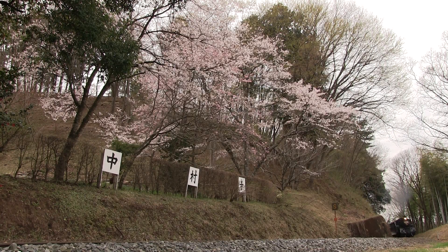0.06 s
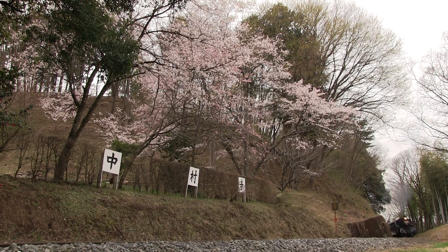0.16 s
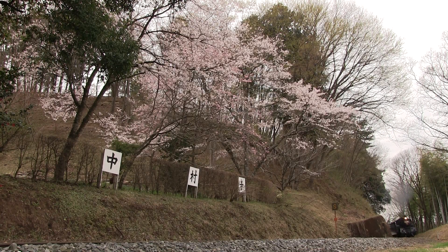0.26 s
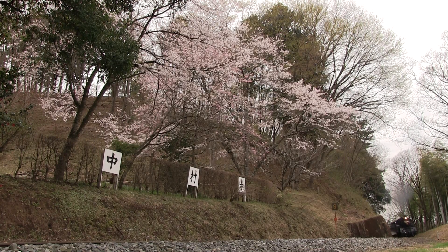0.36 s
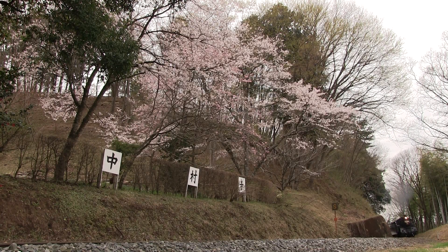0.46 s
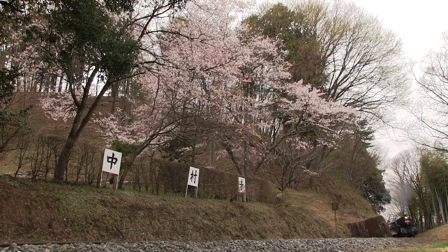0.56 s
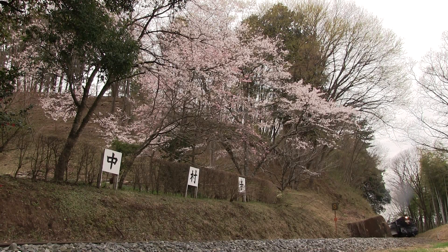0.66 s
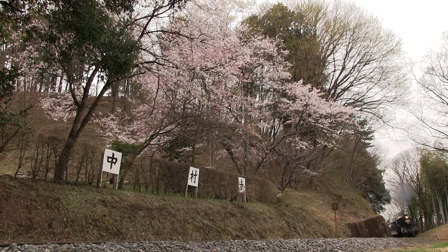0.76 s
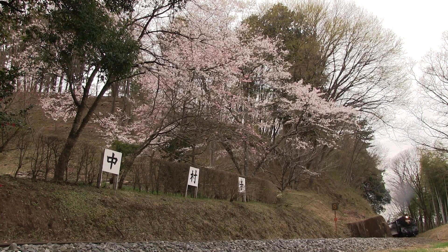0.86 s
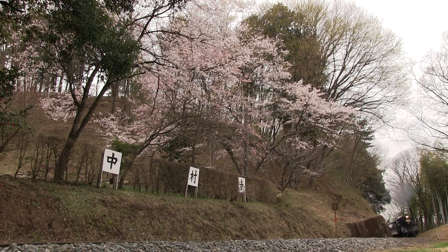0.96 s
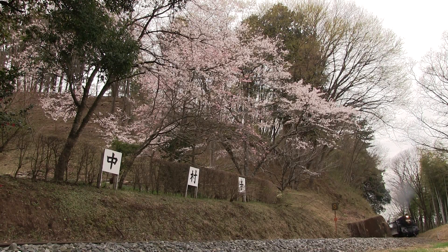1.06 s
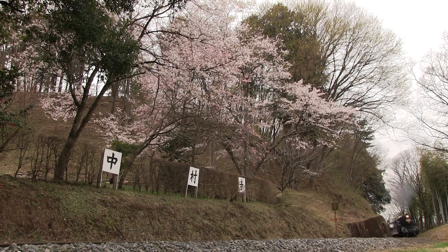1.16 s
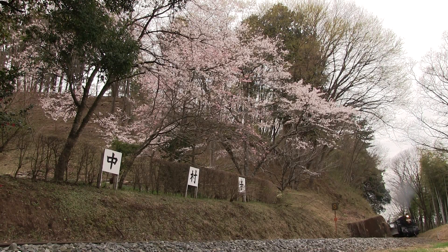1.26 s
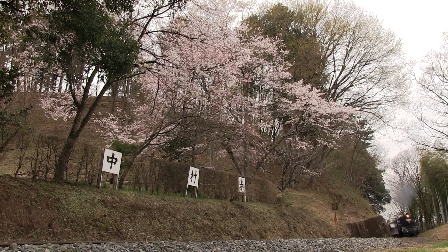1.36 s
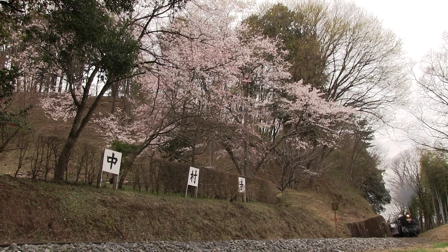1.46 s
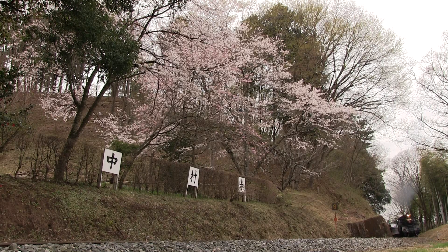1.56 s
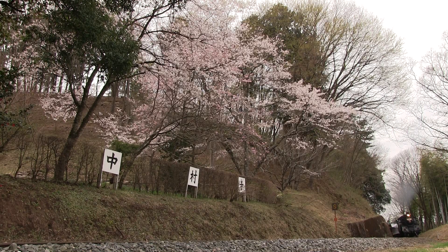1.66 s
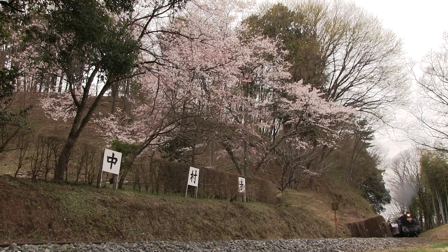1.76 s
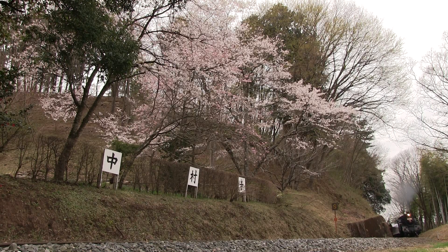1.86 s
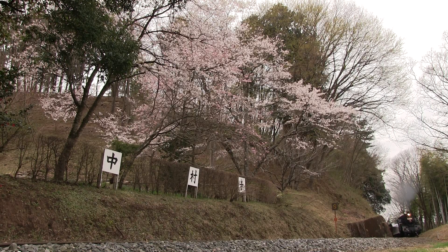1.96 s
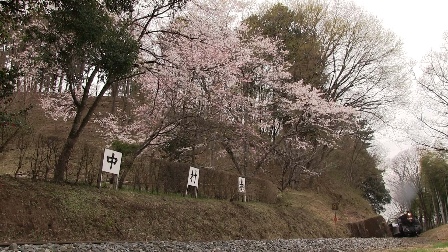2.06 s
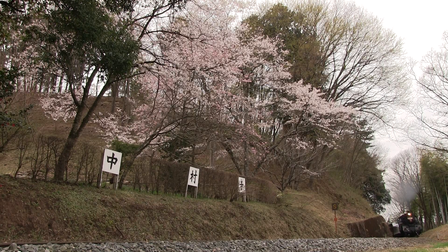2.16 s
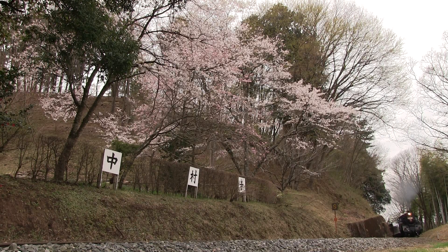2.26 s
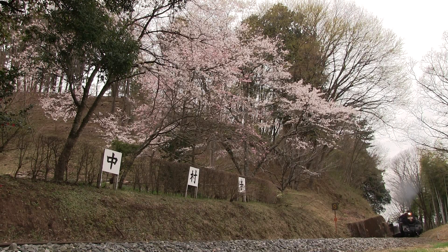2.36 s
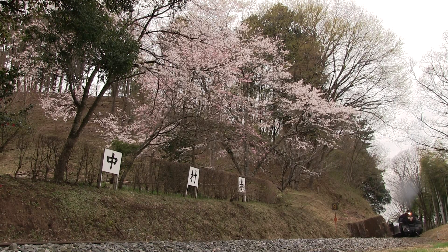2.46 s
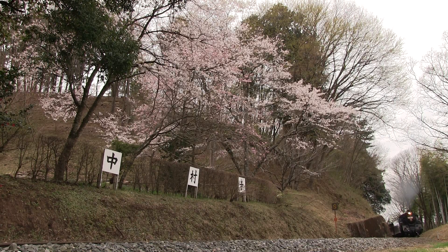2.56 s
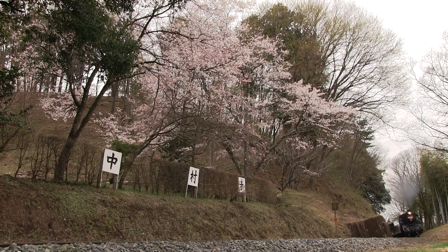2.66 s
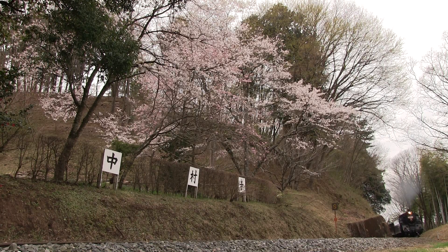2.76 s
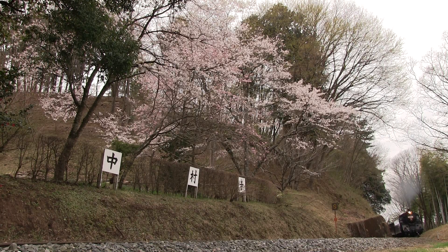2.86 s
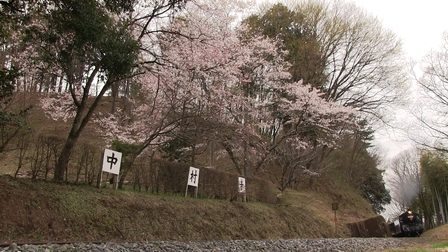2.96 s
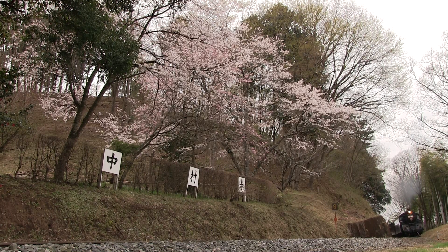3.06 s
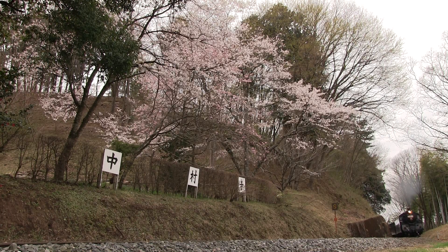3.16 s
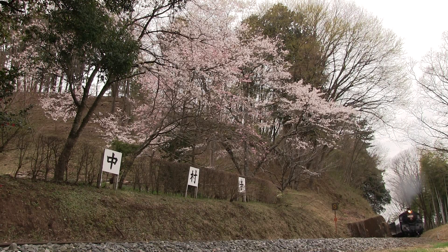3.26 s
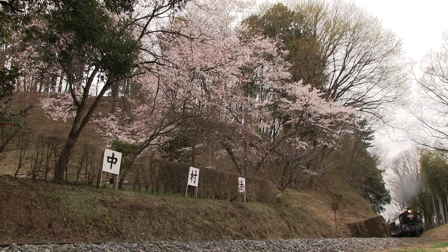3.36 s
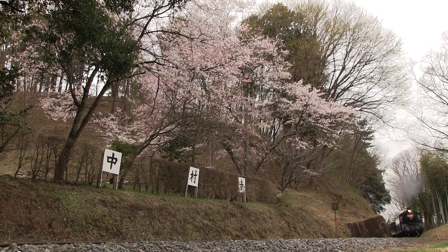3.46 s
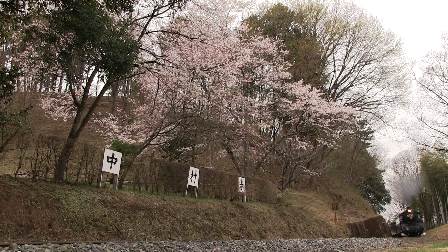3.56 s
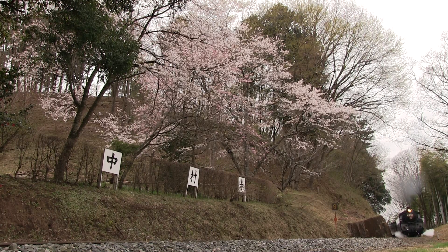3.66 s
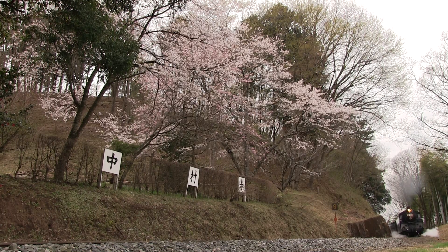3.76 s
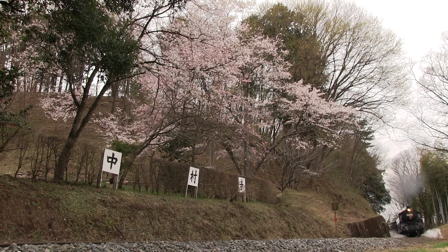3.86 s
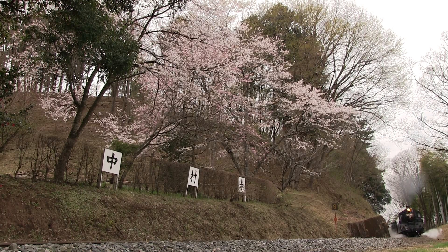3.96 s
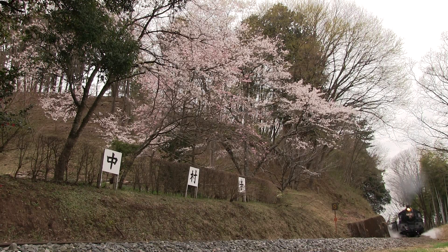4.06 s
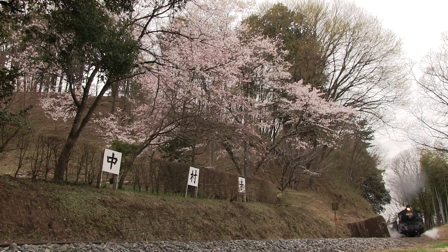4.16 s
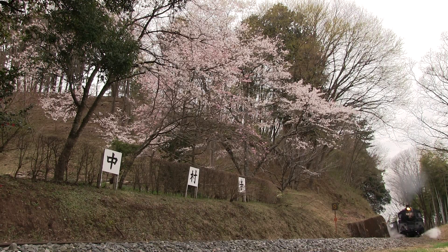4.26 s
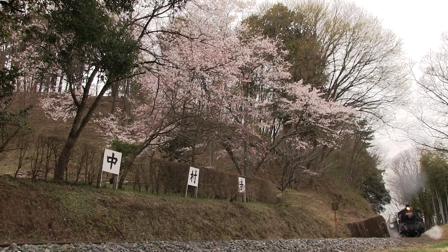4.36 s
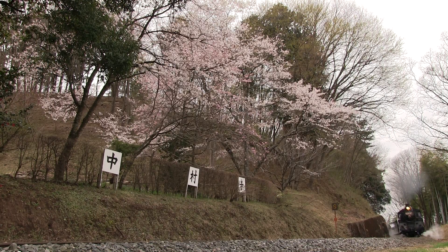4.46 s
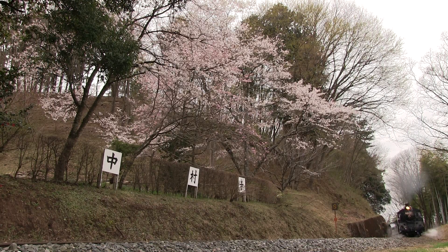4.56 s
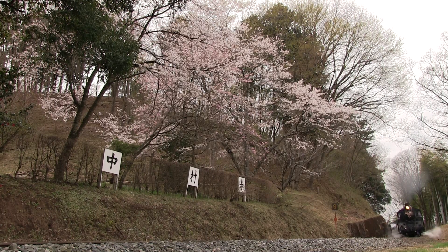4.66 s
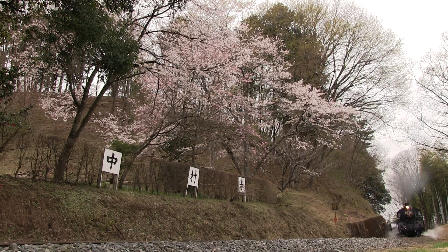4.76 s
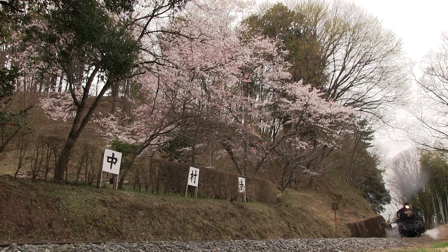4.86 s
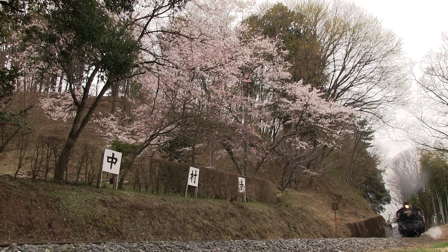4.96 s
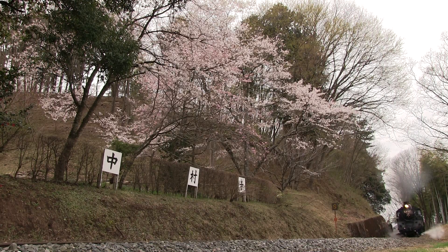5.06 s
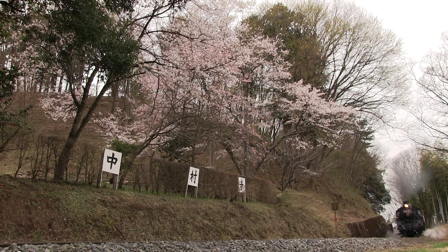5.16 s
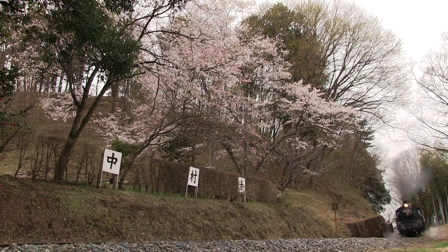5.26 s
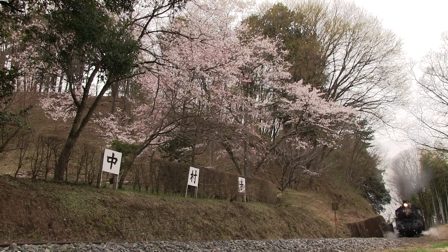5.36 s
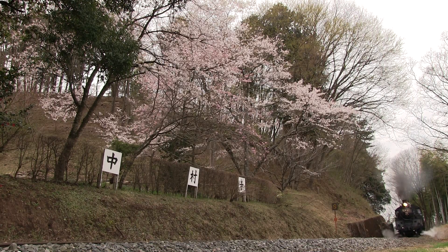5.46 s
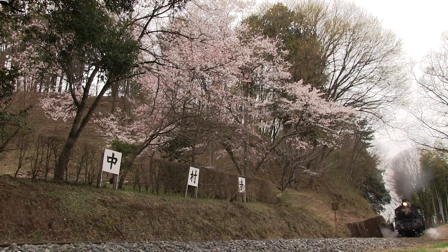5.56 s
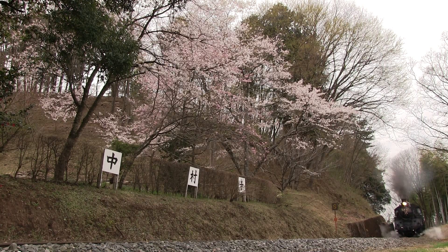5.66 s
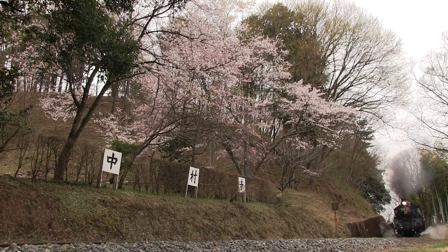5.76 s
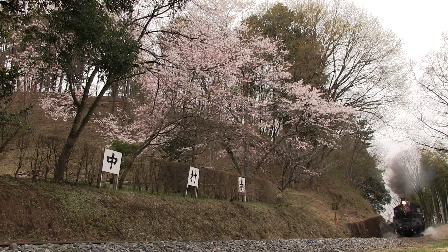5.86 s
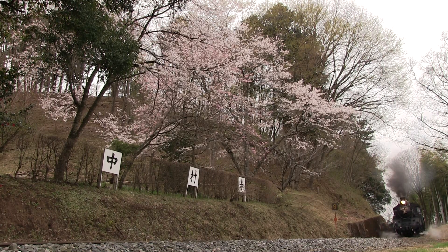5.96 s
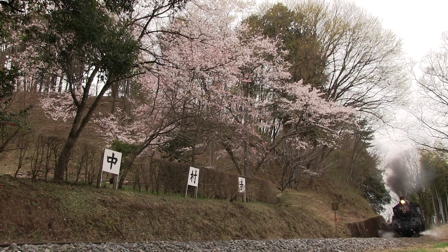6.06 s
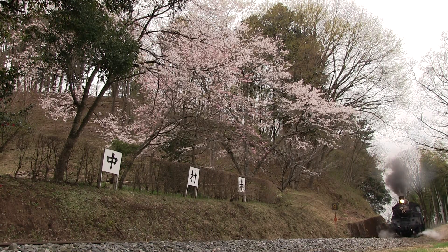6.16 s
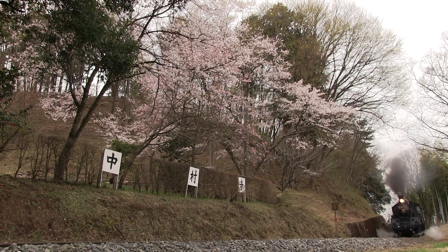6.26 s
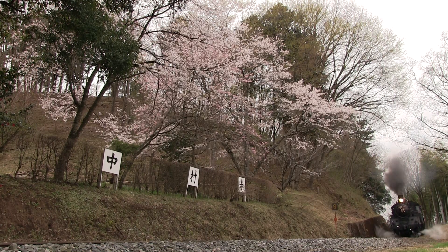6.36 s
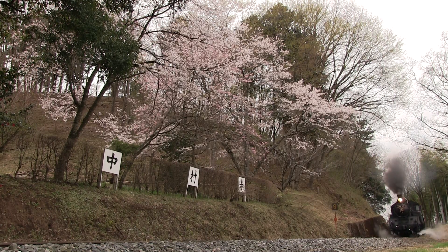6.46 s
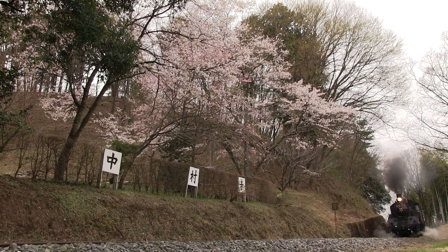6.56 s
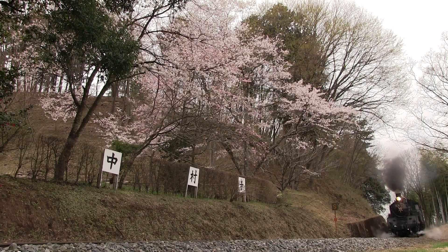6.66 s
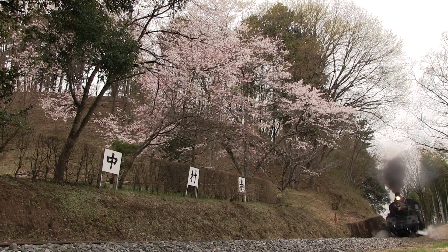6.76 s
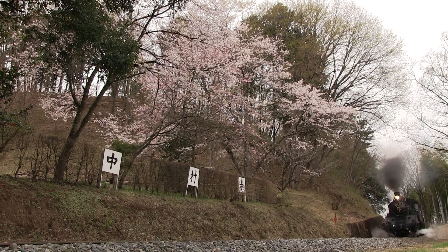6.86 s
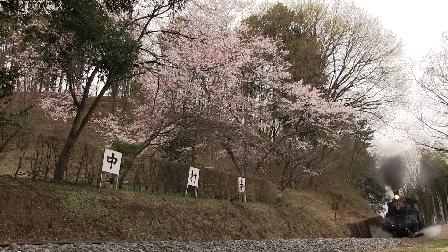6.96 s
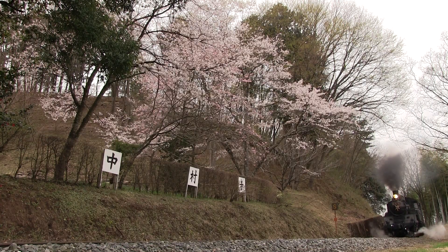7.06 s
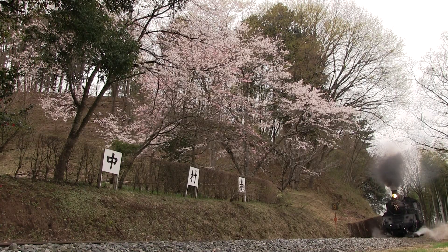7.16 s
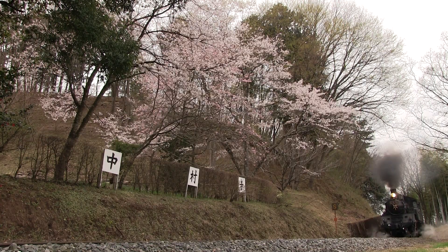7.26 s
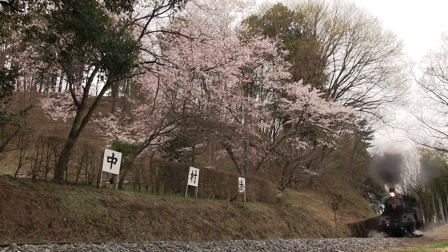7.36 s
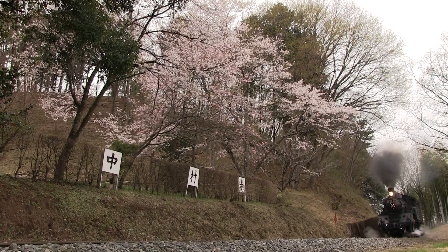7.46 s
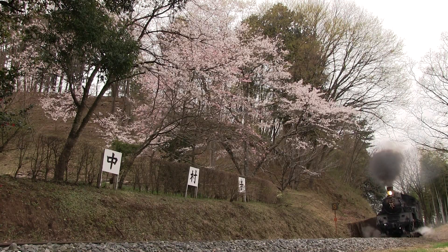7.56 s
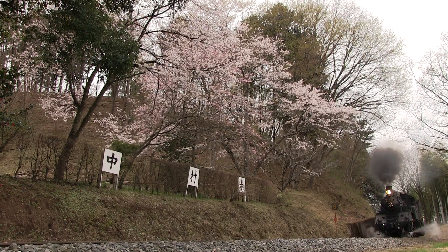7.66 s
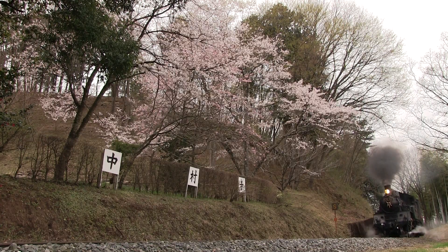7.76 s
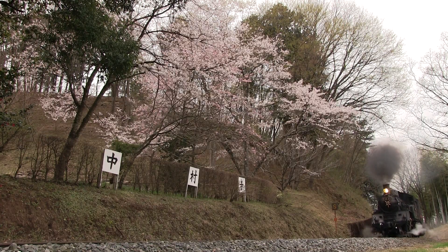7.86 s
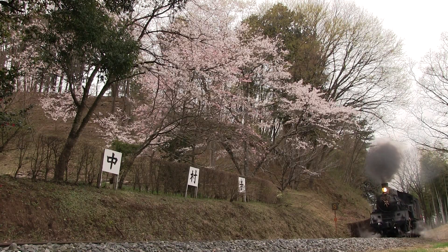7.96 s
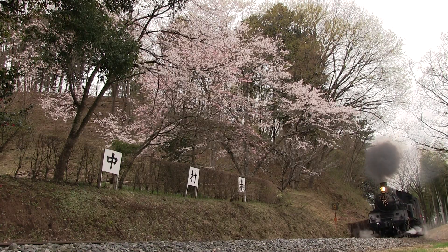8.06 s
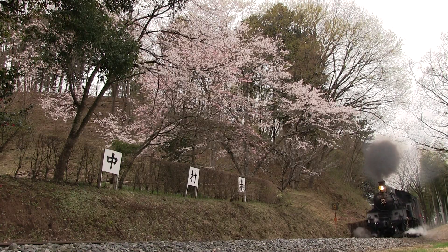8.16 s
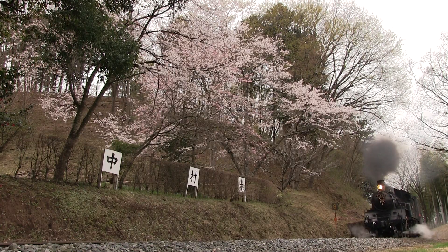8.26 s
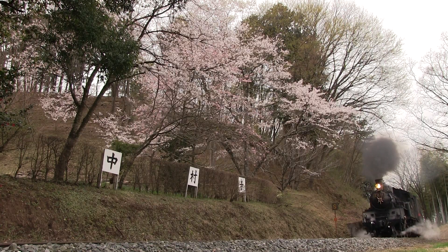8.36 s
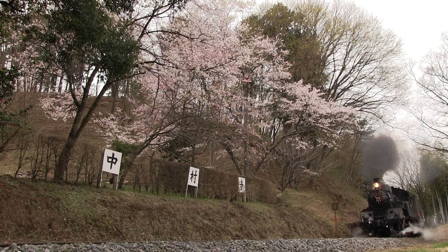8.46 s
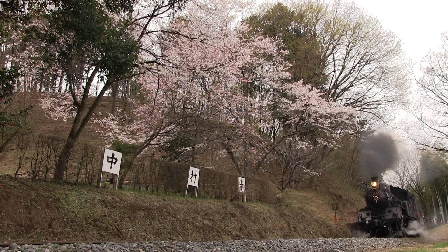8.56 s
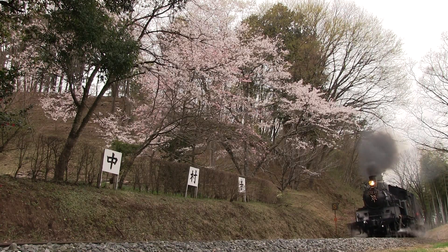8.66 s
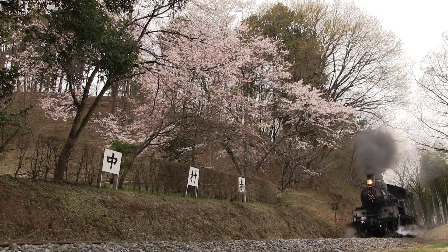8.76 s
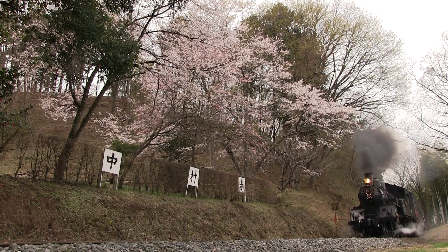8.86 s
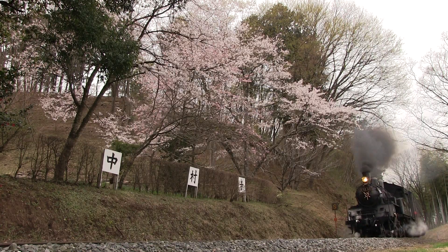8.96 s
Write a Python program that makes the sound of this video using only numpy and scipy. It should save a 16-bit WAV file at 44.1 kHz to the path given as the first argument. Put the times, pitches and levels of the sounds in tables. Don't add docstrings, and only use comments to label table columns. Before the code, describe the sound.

Outdoors beside a track in a wooded cutting, a steam locomotive approaches, slightly right of centre. Hollow, thumping exhaust chuffs come steadily, about six a second, each with a roaring blast and a short diffuse echo from the banks. Rods knock lightly over a low rumble. Just before four seconds, drain steam breaks out in a bright hiss that swells until the stationary stereo microphone overloads, the chuffs still pounding beneath.

```python
import sys
import numpy as np
from scipy import signal
from scipy.fft import rfft, irfft, next_fast_len
from scipy.io import wavfile

SR = 44100
rng = np.random.default_rng(int(sys.argv[2]) if len(sys.argv) > 2 else 0)


def nominal_scale(level):
    x = np.asarray(level, float) / 20
    return 10 ** x


def to_wav(s):
    ch = np.atleast_2d(s).T
    pcm = np.round(np.clip(ch, -1, 1) * 32767)
    wavfile.write(sys.argv[1], SR, pcm.astype(np.int16))


N = 396900

# (valve opens [s], thump peak [dB], blast level [dB], chimney tone level [dB])
EXHAUST_BEATS = [(0.051, -29, -39, -30), (0.383, -27.5, -41, -27.5), (0.722, -25.5, -38, -28),
                 (1.054, -25, -36, -22.5), (1.394, -31, -35.5, -26), (1.726, -28, -36, -29),
                 (2.068, -28, -33, -27), (2.402, -24, -34.5, -25.5), (2.743, -35, -31.5, -20.5),
                 (3.074, -22.5, -34, -27), (3.416, -25.5, -33, -24), (3.748, -22, -34, -24),
                 (4.088, -26, -33, -23.5), (4.417, -24, -33, -31), (4.757, -30, -34, -19),
                 (5.088, -21.5, -36.5, -18.5), (5.423, -26, -36, -30), (5.755, -24, -33.5, -25),
                 (6.091, -33, -32.5, -24.5), (6.422, -22, -34, -23.5), (6.758, -30, -31, -26),
                 (7.085, -23, -35, -22), (7.42, -42, -30.5, -24), (7.749, -19, -32, -23),
                 (8.08, -24, -34.5, -22.5), (8.406, -22, -28.5, -24), (8.731, -32, -30.5, -19.5),
                 (0.208, -30.5, -39, -33), (0.543, -27.3, -39, -38), (0.875, -28, -39.5, -27.5),
                  (1.218, -23, -37, -26), (1.549, -28, -36.5, -35), (1.887, -24, -34, -31),
                  (2.226, -26, -35.5, -25.5), (2.563, -21, -33, -19), (2.897, -25.5, -34, -20.5),
                  (3.235, -22.5, -33.5, -22), (3.571, -21.5, -33.5, -30), (3.908, -21, -32, -22.5),
                  (4.244, -28, -34.5, -30), (4.581, -20, -32, -37), (4.914, -29, -34, -23),
                  (5.248, -23, -34, -32), (5.579, -21, -37.5, -50), (5.915, -21, -31, -46),
                  (6.247, -26, -32.5, -25), (6.582, -23, -31, -23), (6.91, -30, -33.5, -32),
                  (7.243, -20, -32.5, -20), (7.574, -29, -34, -25.5), (7.905, -20, -30.5, -16.5),
                  (8.231, -25, -34, -25), (8.562, -23, -30, -24), (8.886, -23, -30, -35)]


def beats():
    return np.transpose(sorted(EXHAUST_BEATS))


def thumps():
    t = np.arange(int(0.1 * SR)) / SR

    def cycle(centre_s, width_s):
        u = (t - centre_s) / width_s
        return -u * np.exp(0.5 - 0.5 * u ** 2)

    shape = cycle(0.0038, 0.0017) + 0.45 * cycle(0.0171, 0.0019) + 0.36 * cycle(0.0285, 0.0019)
    open_s, thump_db, _, _ = beats()
    steps = np.zeros(N)
    steps[(open_s * SR).astype(int)] = nominal_scale(thump_db)
    return signal.fftconvolve(steps, shape)[:N]


def chimney_tone():
    open_s, _, _, tone_db = beats()
    peak_s = open_s + 0.041
    mode_hz = 179.7 + 6.02 * rng.standard_normal(len(peak_s))
    pitch_hz = np.interp(np.arange(N) / SR, peak_s, mode_hz) * flicker(0.13, 15.6)
    phase = 2 * np.pi * np.cumsum(pitch_hz) / SR
    length = 1.17 ** (np.arange(len(peak_s)) % 2)
    envelope = swells(peak_s, tone_db, rise_s=0.0065 * length, fall_s=0.016 * length)
    return envelope * flicker(0.98, 24) * (np.sin(phase) + nominal_scale(-41.0) * np.sin(2 * phase))


BLAST_LAG_S = 0.023


def blast_envelope():
    open_s, _, blast_db, _ = beats()
    return swells(open_s + BLAST_LAG_S, blast_db, rise_s=0.01, fall_s=0.027)


# (frequency [Hz], density [dB per Hz])
BLAST_SPECTRUM = [(150, -7), (260, -18), (340, -1), (476, -13), (735, -10.5), (988, -12), (1400, -11.5),
                  (1950, -15), (3520, -16), (6000, -24.5), (10200, -36), (15700, -57)]
# (frequency [Hz], width [Hz], level [dB])
BLAST_MODES = [(101.3, 22, 1.5), (183, 32.4, 6.5), (361, 92, -9.5), (563, 21, -7), (723.6, 24, -7.5),
               (1136, 51, -10.5), (1420, 70, -8), (1661, 36, -9.5), (2000, 65, -12), (2316, 58, -13),
               (3280, 370, -11)]
# (time [s], brightness [dB])
SHARPNESS = [(0, -2), (.7, 0.5), (1.3, 7.5), (1.9, 0.8), (2.8, -2.5), (3.7, -6), (5.5, 2.5), (9, -2)]


def blast(flow):
    t = np.arange(N) / SR
    open_s, _, blast_db, _ = beats()
    beat_bright_db = -0.4 - 1.08 * (blast_db + 34)
    bright_db = np.interp(t, open_s + BLAST_LAG_S, beat_bright_db) + curves(SHARPNESS)[0]
    octave_lift_db = 2.93 * np.minimum(bright_db + 1.4 * (np.arange(N) < 2.4 * SR), 3.5)
    white = rng.standard_normal(N)
    ringing = 0
    for k, (hz, width_hz, db) in enumerate(BLAST_MODES):
        level_db = db + (k == 2) * octave_lift_db
        ringing = ringing + flicker(min(hz / 320, 4.5), 11.7, level_db) * narrow(white, hz, 2.06 * width_hz)
    roar = hiss(BLAST_SPECTRUM, patchy_db=2.5, rate=19, bright_db=0.57 * bright_db, bright_hz=2060)
    return flow * (flicker(0.99, 85, 0.47) * roar + nominal_scale(-4.0) * ringing)


# (frequency [Hz], density [dB per Hz])
STEAM_SPECTRUM = [(410, -60), (700, -13), (900, -19), (1300, -12), (2000, -7.5), (2460, -6.5), (3460, -1),
                  (4200, 0), (5540, 1), (6500, 0), (10200, -1.5), (12000, -4), (15700, -9)]
# (frequency [Hz], density [dB per Hz])
LEAK_SPECTRUM = [(1500, -9), (3000, -1.5), (5000, -5), (7000, -9.5), (10000, -14.5), (15700, -26)]
# (frequency [Hz], width [Hz], level [dB])
JET_WHISTLES = [(3430, 290, -26.5), (4430, 250, -22.5), (5500, 200, -34)]
# (time [s], brightness [dB])
JET_PUFFS = [(3.79, 2), (4.08, 1.5), (4.57, 1.5), (4.79, 0), (5.4, -0.5), (5.1, -2), (5.75, -1), (6.07, 0),
             (6.42, 1), (6.73, 6.5), (7.1, 2.5), (7.38, 3.5), (7.7, 1), (8.07, 3.5), (8.37, 2), (8.7, 6),
             (9.0, 3)]


def jets(near_db):
    t = np.arange(N) / SR
    opened = 1 - np.exp(-np.maximum(t - 3.747, 0) / 0.05)
    puff_db = sum(db * np.exp(-0.5 * ((t - s) / 0.076) ** 2) for s, db in JET_PUFFS)
    air_db = -5.5 + 1.07 * (near_db - 5) + 0.27 * puff_db
    steam = hiss(STEAM_SPECTRUM, patchy_db=0.5, rate=5.0, bright_db=-1.7 + puff_db, bright_hz=4150,
                 air_db=air_db, side_db=-8.5 + 0.92 * near_db)
    white = rng.standard_normal(N)
    for hz, width_hz, db in JET_WHISTLES:
        whistle_db = db + 0.43 * (near_db - 5)
        steam = steam + flicker(1.6, 8.1, whistle_db) * narrow(white, hz, width_hz)
    leaks = hiss(LEAK_SPECTRUM, patchy_db=1.5, rate=3.5, bright_db=1.9 * (near_db - 1.0),
                 bright_hz=6000, count=5)
    steam_gain = nominal_scale(-25.0 + near_db - 0.033 * puff_db)
    leak_gain = nominal_scale(-54 + 2.2 * near_db)
    return opened * steam_gain * steam + (1 - opened) * leak_gain * leaks


# (frequency [Hz], density [dB per Hz])
TAIL_SPECTRUM = [(150, -45), (250, -5.5), (788, -5.5), (1120, -7.5), (2000, -3.5), (3000, -11.5),
                 (5630, -22.5), (9660, -35), (15700, -44)]


def bank_echoes(flow):
    r = nominal_scale(-120 / (0.9 * SR))
    lead = SR // 2
    power = signal.lfilter([1 - r], [1, -r], np.r_[flow[:lead], flow] ** 2)[lead:]
    return nominal_scale(-8.0) * np.sqrt(power) * hiss(TAIL_SPECTRUM, patchy_db=4.3, rate=3.8, count=5)


# (time [s], mode [Hz], peak [dB], 60 dB decay time [s])
ROD_KNOCKS = [(.745, 1420, -33, 0.12), (1.048, 1420, -36, 0.076), (1.225, 1700, -36, 0.16),
              (1.59, 1420, -39, .15), (1.73, 1470, -51, 1), (1.735, 2000, -42, 0.47),
              (1.888, 1990, -41, .2), (2.23, 756.5, -37.5, 0.32), (2.42, 745, -36, .35),
              (2.424, 1637, -32, 0.077), (2.76, 1404, -36, 0.17), (3.075, 2000, -45, 0.23),
              (3.435, 1384, -29.5, 0.16), (3.57, 2000, -45, 0.15)]


def rods():
    out = np.zeros(N)
    t = np.arange(SR // 2) / SR
    for s, hz, db, t60_s in ROD_KNOCKS:
        envelope = nominal_scale(db - 60 * t / t60_s) * (1 - np.exp(-t / 0.0015))
        out[round(s * SR):][:len(t)] += envelope * np.sin(2 * np.pi * hz * t)
    return out * flicker(4.1, 25)


# (frequency [Hz], density [dB per Hz])
RUMBLE_SPECTRUM = [(15, -48), (25, -10), (74, -1.5), (124, 2.5), (173, 1), (202, 0), (257, -14.5),
                   (300, -48), (390, -41), (660, -120)]
# (frequency [Hz], density [dB per Hz])
RATTLE_SPECTRUM = [(150, -25), (300, 0), (600, 0), (1200, -5), (2500, -15), (5000, -55)]


def rolling(near_db, flow):
    r = nominal_scale(-60 / (0.22 * SR))
    draught = unit(signal.lfilter([1 - r], [1, -r], flow * nominal_scale(-near_db)))
    rumble = nominal_scale(-43.5 + 0.88 * near_db) * hiss(RUMBLE_SPECTRUM, patchy_db=2.5, rate=6.6, count=2)
    rattle = nominal_scale(-52.5 + 1.425 * near_db) * hiss(RATTLE_SPECTRUM, patchy_db=-1.0, rate=7, count=5)
    return rumble * (1 - 0.34 + 0.34 * draught) + rattle


# (frequency [Hz], left-right likeness [0 to 1])
LIKENESS = [(60, 1), (640, 0.95), (1400, 0.95), (3100, .96), (5500, 0.95), (7500, 0.99), (8800, 0.99),
            (15000, 1)]


def hiss(spectrum, patchy_db, rate, bright_db=0, bright_hz=4600, air_db=0, side_db=0, count=10):
    size = next_fast_len(N)
    hz = np.arange(size // 2 + 1) * SR / size
    alike = np.clip(at_hz(LIKENESS, hz), 0, 1)
    mid_side = np.sqrt([1 + alike, 1 - alike])
    pair = nominal_scale(at_hz(spectrum, hz)) * mid_side * rfft(rng.standard_normal((2, size)))
    power = np.abs(pair[0]) ** 2
    place = np.clip((count - 1) / 6 * np.log2((hz + 1) / 250), 0, count - 1)
    out = 0
    for k in range(count):
        share = np.clip(1 - np.abs(place - k), 0, 1)
        if np.sum(power * share) > 1e-6 * power.sum():
            band_hz = 250 * 2 ** (6 * k / (count - 1))
            lift = np.clip(np.log2(band_hz / bright_hz), 0, 1.2)
            level_db = lift * bright_db + (k == count - 1) * air_db
            out = out + irfft(pair * share, size)[:, :N] * flicker(patchy_db, rate, level_db)
    mid, side = out * size / np.sqrt(2 * power.sum())
    return mid + side * nominal_scale(side_db) * [[1], [-1]]


def swells(at_s, level_db, rise_s, fall_s):
    out = np.zeros(N)
    for s, db, up, down in np.broadcast(at_s, level_db, rise_s, fall_s):
        i = np.arange(max(int((s - 0.08) * SR), 0), min(int((s + 0.3) * SR), N))
        t = i / SR - s
        out[i] += nominal_scale(db) * 2 / (np.exp(-t / up) + np.exp(t / down))
    return out


def flicker(depth_db, rate, plus_db=0):
    wander_db = depth_db * drift(rate)[:len(range(0, N, 40))]
    gain = nominal_scale(wander_db + np.broadcast_to(plus_db, N)[::40])
    return np.interp(np.arange(N) / 40, np.arange(len(gain)), gain)


def drift(rate):
    r = np.exp(-80 * np.pi * rate / SR)
    white = rng.standard_normal(N // 40 + 2002)
    return unit(signal.lfilter([1], [1, -2 * r, r * r], white)[2000:])


def resonance(x, hz, width_hz):
    r = np.exp(-np.pi * width_hz / SR)
    poles = [1, -2 * r * np.cos(2 * np.pi * hz / SR), r * r]
    return signal.lfilter([(1 - r * r) / 2, 0, (r * r - 1) / 2], poles, x)


def narrow(x, hz, width_hz):
    return unit(resonance(resonance(x, hz, width_hz), hz, width_hz))


def unit(x):
    return x / np.sqrt(np.mean(x ** 2) + 1e-20)


def curves(rows):
    s, *columns = np.transpose(rows)
    return [np.interp(np.arange(N) / SR, s, column) for column in columns]


def at_hz(points, hz):
    point_hz, value = np.transpose(points)
    return np.interp(np.log(hz + 1), np.log(point_hz), value)


# (time [s], gain [dB])
NEARNESS = [(0, 1), (1.2, 1.5), (2.5, 2.5), (3.65, 3.5), (3.9, 4.5), (4.8, 5.5), (5.4, 6.5), (5.95, 7),
            (6.1, 8.5), (6.6, 9), (7.1, 10), (7.4, 11.5), (7.9, 11.5), (8.4, 12.5), (9, 13.5)]


def scene():
    flow = blast_envelope()
    near_db = curves(NEARNESS)[0]
    exhaust = thumps() + chimney_tone() + blast(flow) + bank_echoes(flow)
    return exhaust + rods() + jets(near_db) + rolling(near_db, flow)


def roll_off(x):
    return signal.sosfilt(signal.butter(12, 16710, fs=SR, output="sos"), x)


# (frequency [Hz], left minus right [dB])
CHANNEL_BALANCE = [(60, -2.4), (380, -1.5), (700, -1), (1300, -4), (2400, 0), (3500, -2.5), (5500, -0.5),
                   (7500, -0.4), (9800, -2.5), (12500, -3.5), (13800, -1)]


def record(dry):
    overload, knee = 0.36, 2.27
    squeezed = dry / (1 + np.abs(dry / overload) ** knee) ** (1 / knee)
    size = next_fast_len(N + 8192)
    hz = np.arange(size // 2 + 1) * SR / size
    top_cut = np.clip((15800 - hz) / 150, 0, 1)
    bass_cut = hz ** 2 / (hz ** 2 + 34.0 ** 2)
    balance = nominal_scale(at_hz(CHANNEL_BALANCE, hz) * [[0.5], [-0.5]])
    mix = irfft(rfft(squeezed, size) * top_cut * bass_cut * balance, size)[:, :N]
    return roll_off(mix)


dry = scene()
out = record(dry)
to_wav(out)
```